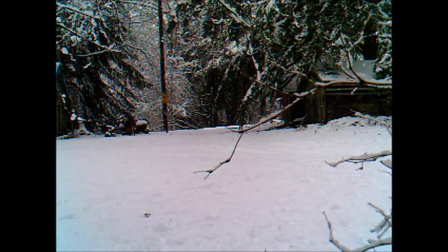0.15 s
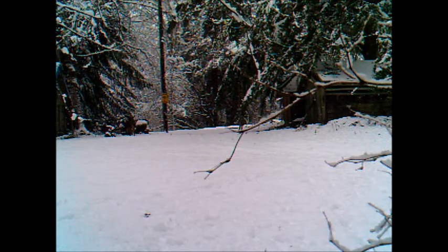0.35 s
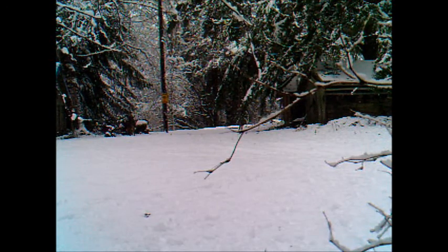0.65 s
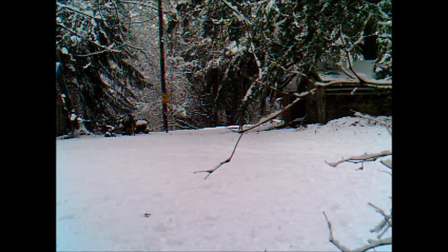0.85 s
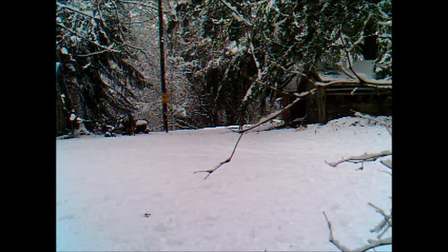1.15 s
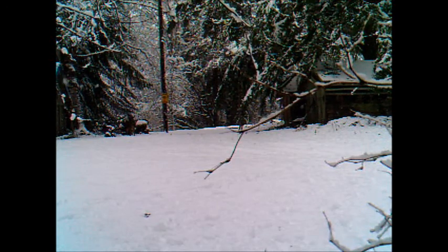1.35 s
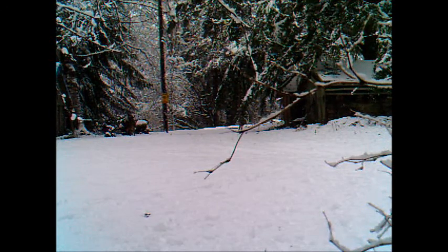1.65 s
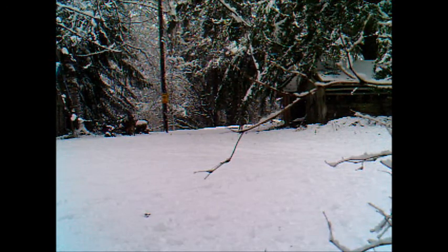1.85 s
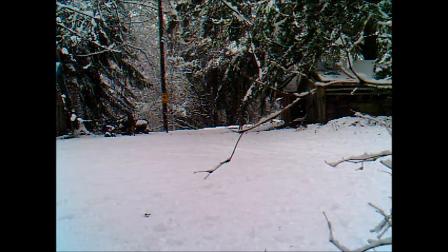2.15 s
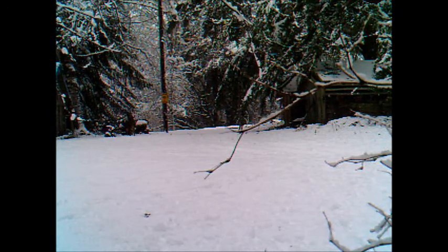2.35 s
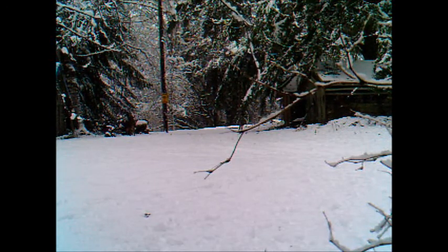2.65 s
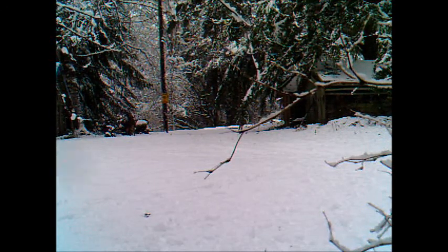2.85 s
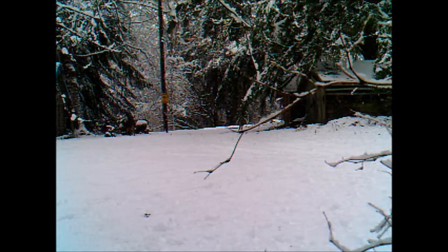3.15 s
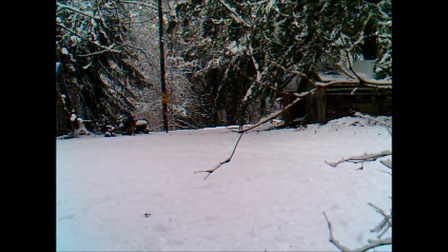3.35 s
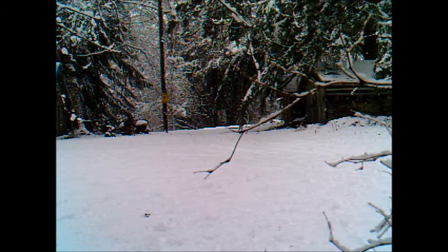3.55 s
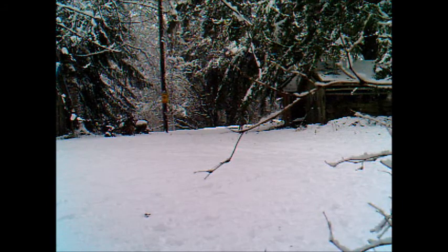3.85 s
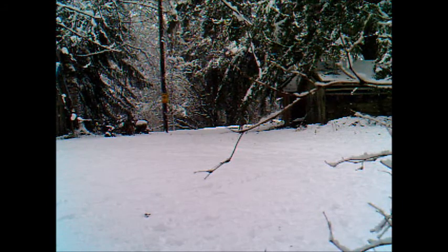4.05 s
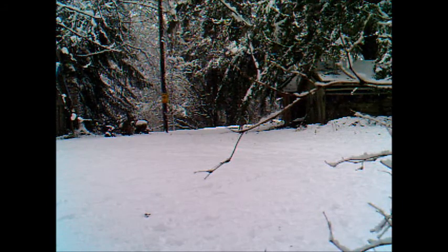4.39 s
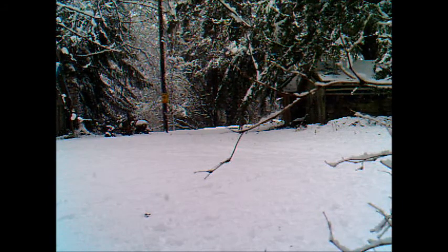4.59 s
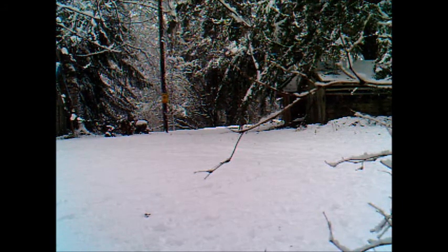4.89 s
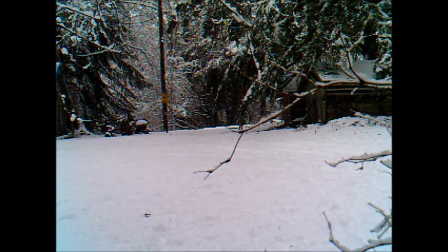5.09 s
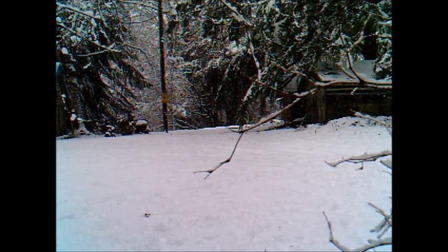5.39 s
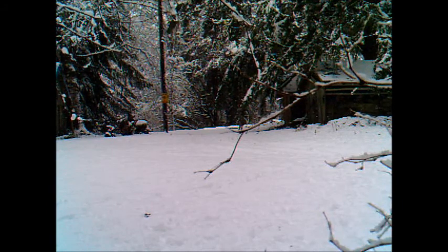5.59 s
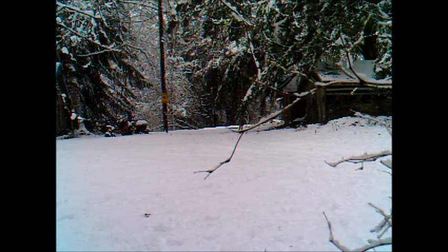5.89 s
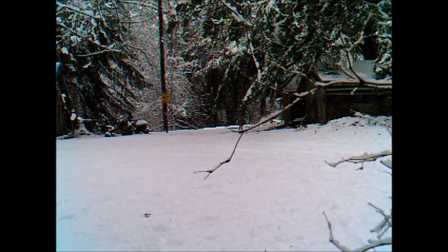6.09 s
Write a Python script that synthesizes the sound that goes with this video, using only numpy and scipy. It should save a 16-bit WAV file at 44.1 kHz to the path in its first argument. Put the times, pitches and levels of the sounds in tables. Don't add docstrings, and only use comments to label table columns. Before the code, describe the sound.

A steady buzzing low hum with faint hiss underlies sparse icy ticks and light snow patter, gathering into a brief cluster, then thinning.

```python
import sys
import numpy as np
from scipy import signal
from scipy.fft import rfft, irfft
from scipy.io import wavfile
from scipy.ndimage import uniform_filter1d

SR = 44100
rng = np.random.default_rng(int(sys.argv[2]) if len(sys.argv) > 2 else 0)


def how_loud(loudness_db):
    steps = np.asarray(loudness_db, float) / 20
    return 10 ** steps


def master_out(mix):
    frames = np.transpose(np.atleast_2d(mix))
    ceiling = np.clip(frames, -1, 1)
    pcm = np.round(ceiling * 32767).astype(np.int16)
    wavfile.write(sys.argv[1], SR, pcm)


N = 274743
PORT_HZ, PORT_WIDTH_HZ = 3286, 465


def ring(x, hz, width_hz):
    return signal.lfilter(*signal.iirpeak(hz, hz / width_hz, fs=SR), x)


def level(x, db):
    return x * how_loud(db) / np.sqrt(np.mean(x ** 2))


def walk(rate):
    hold = int(SR / rate)
    steps = np.repeat(rng.standard_normal(N // hold + 1), hold)
    slewed = uniform_filter1d(uniform_filter1d(steps, hold), hold)
    return 1.34 * slewed[:N]


FRAME_S, FIRST_FRAME_S = .032015, -.0013
FIRST_WRITE_S, WRITE_EVERY_S = .1844, 1.
# delay in ms, how many frames it lasts.
CARD_WRITES = [(17, 8), (7.5, 5), (10, 1), (11, 1), (8, 2), (10.5, 3), (10.5, 1)]
# frame number, delay in ms.
HICCUPS = [(15, 6), (17, 4.5), (19, 5), (35, 6), (89, 4.5), (101, 6), (105, 6), (166, 4.5), (167, 5),
           (179, 5.5), (183, 5), (187, 5.5)]


def stalls():
    held = dict(HICCUPS)
    for k, (late_ms, frames) in enumerate(CARD_WRITES):
        write_s = FIRST_WRITE_S + k * WRITE_EVERY_S
        first = int((write_s - FIRST_FRAME_S) / FRAME_S)
        for j in range(frames):
            held[first + j] = late_ms * np.sin(np.pi * (j + 1) / (frames + 1)) ** .5
    return held


# ms after the job starts, step size (linear).
JOB_STEPS = [
    (0.13, 0.098),
    (1.96, 0.059),
    (6.5, 0.035),
    (8.5, -0.037),
    (13, -0.056),
    (20, -0.055),
    (23.1, -0.039),
]
JOB_END_MS = 29.7
# ms after frame start, step size (linear).
READOUT_STEPS = [
    (2.0, .042),
    (23.4, -.042),
]
DROPPED_FRAMES = [3, 42, 83, 129, 174]


def hum():
    frames = np.arange(-8, int(N / SR / FRAME_S) + 1)
    chance = rng.standard_normal((len(frames), len(JOB_STEPS) + 3))
    late_ms = 0.33 * np.abs(chance[:, -1])
    held = stalls()
    for k, frame in enumerate(frames):
        backlog_ms = 0.492 * late_ms[k - 1]
        late_ms[k] = max(held.get(frame, late_ms[k]), backlog_ms)
    load = how_loud(1.12 * chance[:, -2]) * ~np.isin(frames, DROPPED_FRAMES)

    lead = SR // 2
    current = np.zeros(N + 2 * lead)
    start = lead + (FIRST_FRAME_S + frames * FRAME_S) * SR
    leftover = sum(step for _, step in JOB_STEPS)
    for k, (ms, step) in enumerate(JOB_STEPS + [(JOB_END_MS, -leftover)]):
        hurry = 1 - 0.0121 * ms
        jitter_ms = 0.33 * np.sign(k) * chance[:, k]
        at_ms = ms + late_ms * hurry + jitter_ms
        np.add.at(current, (start + at_ms * SR / 1000).astype(int), step * load)
    for ms, step in READOUT_STEPS:
        np.add.at(current, (start + ms * SR / 1000).astype(int), step)

    supply_hz, coupling_hz = 61, 6.2
    sag = signal.lfilter(*signal.butter(1, supply_hz, fs=SR), -np.cumsum(current))
    sag = signal.lfilter(*signal.butter(1, 600, fs=SR), sag)
    return signal.lfilter(*signal.butter(1, coupling_hz, "high", fs=SR), sag)[lead:lead + N]


# frequency in Hz, level in dB per Hz.
HISS_COLOR = [(20, 8.5), (50, 4.5), (105, -1), (150, 0), (205, -11.5), (310, -4), (360, -14), (520, -12.5),
              (700, -18.5), (1000, -19.5), (2200, -21.5), (4500, -29.5), (6500, -28.5), (9800, -29)]
# frequency in Hz, rms level in dB.
CLOCK_WHINES = [(480, -72), (531, -71.5), (625, -82), (3400, -84), (4800, -74), (5600, -79), (7400, -82),
                (9600, -80)]


def circuit():
    hz, db = np.transpose(HISS_COLOR)
    bins_hz = np.fft.rfftfreq(N, 1 / SR) + 1
    color = how_loud(np.interp(np.log(bins_hz), np.log(hz), db))
    hiss = irfft(rfft(rng.standard_normal(N)) * color, N)
    t = np.arange(N) / SR
    whine = sum(np.sqrt(2) * how_loud(db) * np.sin(2 * np.pi * hz * t) for hz, db in CLOCK_WHINES)
    return level(hiss, -40) + whine


def port(x, leak_db):
    return ring(x, PORT_HZ, PORT_WIDTH_HZ) + how_loud(leak_db) * x


# time in seconds, level in dB.
SIFT_LEVEL = [(0.0, -53.5), (0.62, -53.5), (2.9, -53), (3.21, -52), (3.71, -52.5), (4.04, -50),
              (4.48, -50.5), (4.86, -52), (6.06, -50.5), (6.23, -50.5)]
# center in seconds, swell in dB, length in ms.
SNOW_SHOWERS = [(.03, 4, 12), (.13, 3, 6.3), (1.497, 2, 7.3), (2.53, -1, 12), (2.81, 3.5, 18),
                (2.995, 7, 12), (3.035, 8, 9.9), (3.095, 3, 10), (3.583, 17.5, 5.4), (3.83, 7, 16),
                (3.93, 10, 16), (4.02, 0, 38), (4.39, 7, 7.3), (4.549, 2.5, 20), (4.63, 6, 14),
                (5.42, 7, 8.4), (6.17, 2, 15)]


def sifting(per_s=3500):
    s, db = np.transpose(SIFT_LEVEL)
    t = np.arange(N) / SR
    draw = rng.random((2, N))
    lands = draw[0] < per_s / SR
    size_db = np.minimum(-1.8 * np.log(1 - draw[1]), 9)
    grains = lands * how_loud(size_db) * np.sign(rng.standard_normal(N))
    shower_db = sum(swell_db * np.exp(-(1000 * (t - at) / ms) ** 2) for at, swell_db, ms in SNOW_SHOWERS)
    flurry = how_loud(np.interp(t, s, db) + shower_db + 0.88 * walk(40))
    patter = port(ring(grains, PORT_HZ, 3150.0) + 0.26 * grains, leak_db=-14)
    return flurry * level(patter, 0)


# start in seconds, peak in dB, crack in dB
MORE_CRUMBS = [(0.1485, -35, -30), (0.2034, -38, -6), (1.004, -39, -4), (2.5255, -34, -6),
               (2.538, -37, -14), (2.62, -40, -14), (2.9916, -38, -19), (3.0277, -44, 1),
               (3.6451, -35, -13), (3.846, -37, -9), (3.8633, -34.5, -15), (3.9313, -34, -9),
               (4.0395, -32, -2), (4.114, -41, -2), (4.1399, -40, -5), (4.264, -38, -19),
               (4.2818, -36, -12), (4.3462, -39, 2), (4.4223, -38, -22), (4.4776, -37, -5),
               (4.512, -35, -15), (4.546, -36, -11), (4.5546, -36, -7), (5.1348, -36, -23),
               (5.216, -37, -8), (5.4892, -40, -9), (5.5952, -36, -19), (5.693, -36, -18),
               (6.0655, -37, -13), (6.1732, -38, -17)]


def specks(count=2):
    stray_db, stray_crack_db = -42, -20
    spread_hz, typical_crumble_ms = 130, 1.04
    luck = rng.standard_normal((len(SNOW_SHOWERS), count, 2))
    strays = []
    for (s, _, ms), rows in zip(SNOW_SHOWERS, luck):
        for a, b in rows:
            strays.append((abs(s + ms / 1000 * a), stray_db + 2 * b, stray_crack_db))
    extra = MORE_CRUMBS + strays
    luck = rng.standard_normal((len(extra), 2))
    return [(s, db, PORT_HZ + spread_hz * a, crack_db, typical_crumble_ms * np.exp(1.2 * b))
            for (s, db, crack_db), (a, b) in zip(extra, luck)]


# start in seconds, peak in dB, ring in Hz,
# crack in dB above the ring, crumble in ms.
ICE_CRUMBS = [(0.0415, -32, 3450, -20, 0.76), (0.0832, -26.5, 3450, -17, 3.2),
              (1.4885, -31.5, 3320, -6.5, 3.9), (2.7787, -32, 3160, -9, 6.3),
              (2.9258, -26.5, 3430, -15, 1.4), (3.0363, -34, 3000, -6, 1.5), (3.0392, -38, 3230, -8, 3.5),
              (3.5799, -33, 3440, -21, 9.1), (3.5839, -23, 3520, -25, 1.6), (3.82, -34, 3560, -0.5, 2.3),
              (3.8248, -35, 3380, -9, 2.3), (3.8348, -29.5, 3200, -17, 0.6), (3.9189, -29, 3400, -23, 2.4),
              (3.9228, -39, 3630, -22, 11), (3.9341, -31, 3450, -30, 3.6), (3.9775, -17.5, 3330, -18, 0.79),
              (4.0286, -24.5, 3500, -19, 1.6), (4.0353, -25.5, 3430, -11, 6.2),
              (4.0528, -19, 3350, -14, 0.6), (4.2188, -33, 3300, -11, 2.2), (4.3123, -19.5, 3280, -15, 1.7),
              (4.3878, -31, 3120, -7, 5.3), (4.3986, -10.5, 3180, -22.5, 0.85),
              (4.4013, -28, 3340, -19, 1.8)]


def crumbs(size=1024):
    lowest_crack_hz, crack_spread_hz = 4710, 570
    out, ms = np.zeros(N + size), np.arange(size) / SR * 1000
    rows = ICE_CRUMBS + specks()
    chance = rng.standard_normal((len(rows), 3, size))
    shell = signal.butter(2, [2500, 4000], "band", fs=SR, output="sos")
    for (s, db, hz, crack_db, crumble_ms), (sign, scatter, grit) in zip(rows, chance):
        fade = np.exp(-ms / max(.5 * crumble_ms, .1))
        splinters = sign * how_loud(4.0 * scatter) * fade * 0.059 * np.sqrt(crumble_ms)
        splinters[0] = 1.02 / (1 + 0.39 * crumble_ms)
        body = ring(ring(signal.sosfilt(shell, splinters), hz, 540.0), PORT_HZ, 2200.0)

        crack_hz = min(lowest_crack_hz + crack_spread_hz * abs(scatter[0]), 9000)
        grit = grit * fade * (1 - np.exp(-ms / 0.28))
        crack = ring(ring(grit, crack_hz, 1100.0), crack_hz, 1900.0)
        crack = crack + 0.25 * ring(ring(grit, 6500.0, 5000.), 6800.0, 6000.)

        tick = body / np.abs(body).max() + how_loud(crack_db + 3.5) * crack / np.abs(crack).max()
        start = int(s * SR)
        out[start:start + size] += how_loud(db) * tick
    return out[:N]


# center in seconds, peak in dB, length in ms.
CLUMP_KNOCKS = [
    (0.086, -51, 3),
    (3.583, -46, 2.7),
    (4.3977, -35, 0.7),
    (3.923, -43.5, 5),
    (3.931, -53, 6.1),
    (3.941, -54, 3.3),
    (4.039, -46, 4.4),
    (6.2, -53, 49),
]


def knocks():
    t = np.arange(N) / SR
    swell = sum(how_loud(db) * np.exp(-(1000 * (t - s) / ms) ** 2) for s, db, ms in CLUMP_KNOCKS)
    return swell * level(ring(rng.standard_normal(N), 1100.0, 1600.0), 0)


def scene():
    camera = hum() + circuit()
    snow = sifting() + crumbs() + knocks()
    return (camera + snow)[None]


def low_pass(x):
    return signal.sosfilt(signal.butter(12, 11250, fs=SR, output="sos"), x)


def record(dry):
    top_hz, offset = 12020, -.0204
    cut = signal.sosfilt(signal.cheby2(10, 60, top_hz, fs=SR, output="sos"), dry)
    return low_pass(cut + offset)


dry = scene()
out = record(dry)
master_out(out)
```